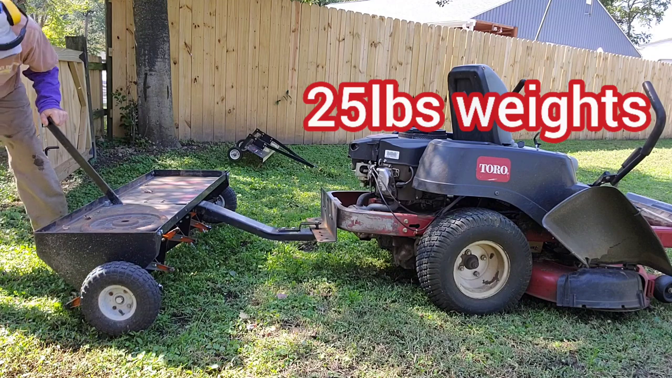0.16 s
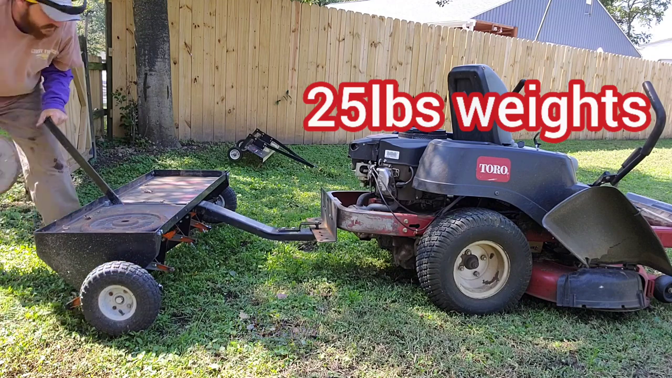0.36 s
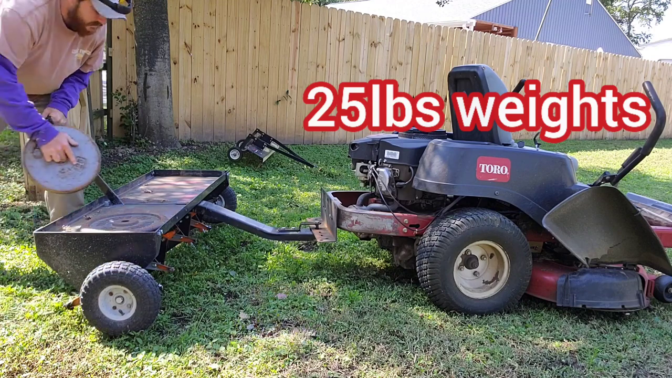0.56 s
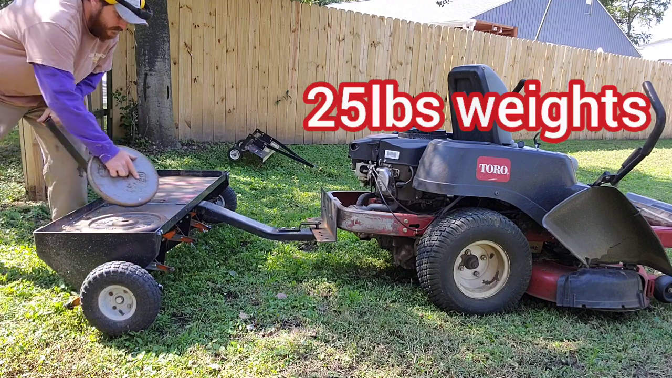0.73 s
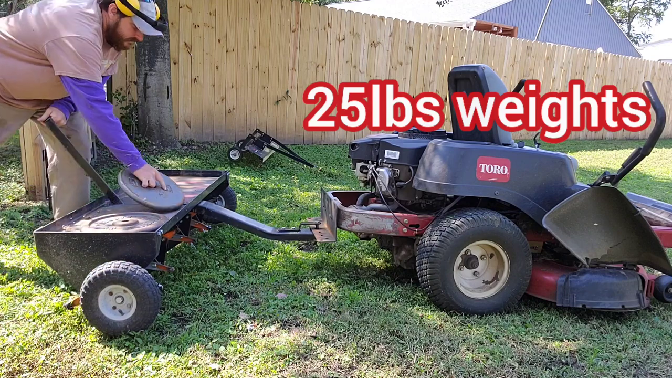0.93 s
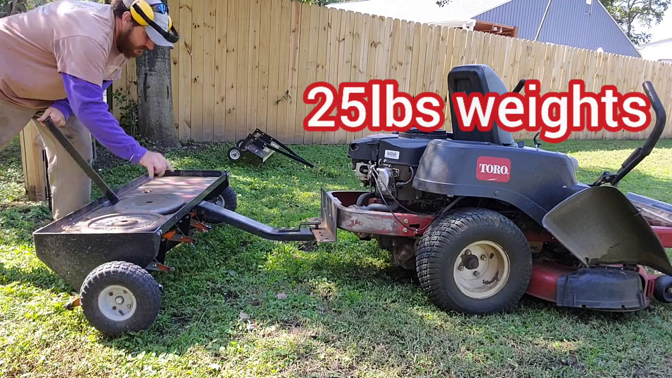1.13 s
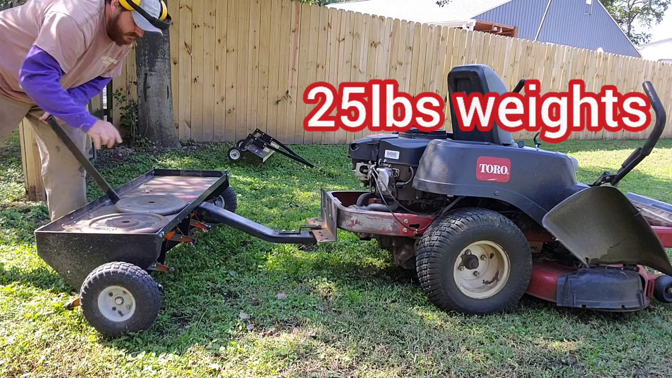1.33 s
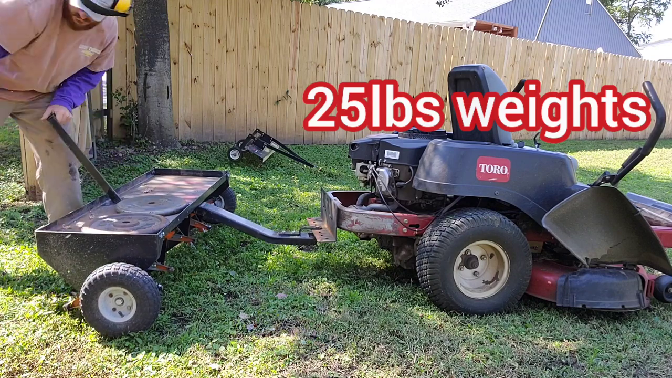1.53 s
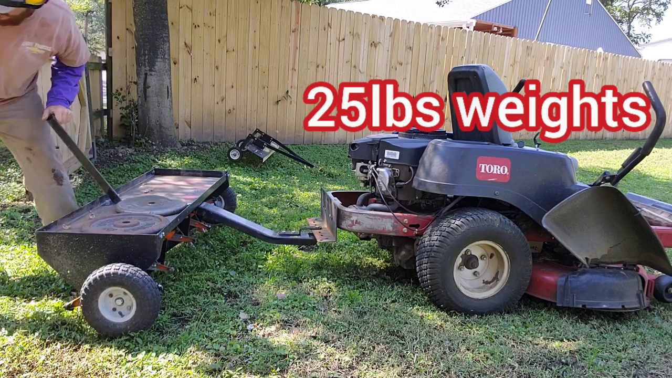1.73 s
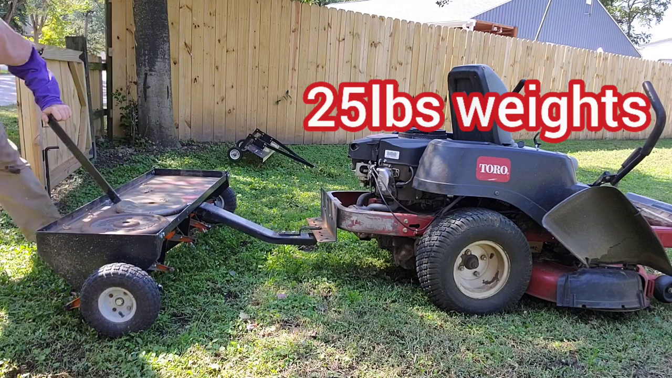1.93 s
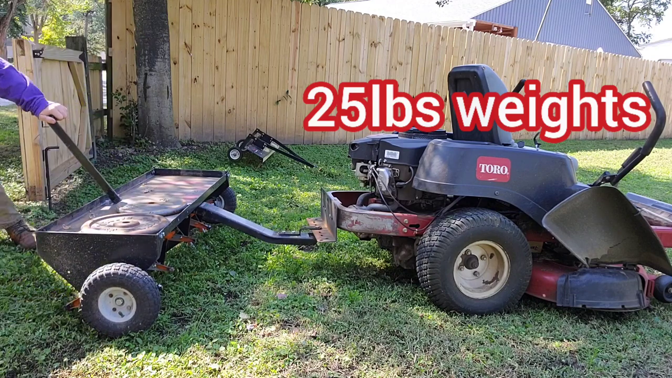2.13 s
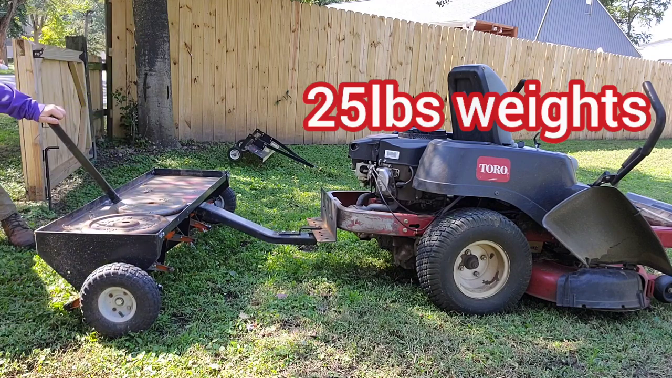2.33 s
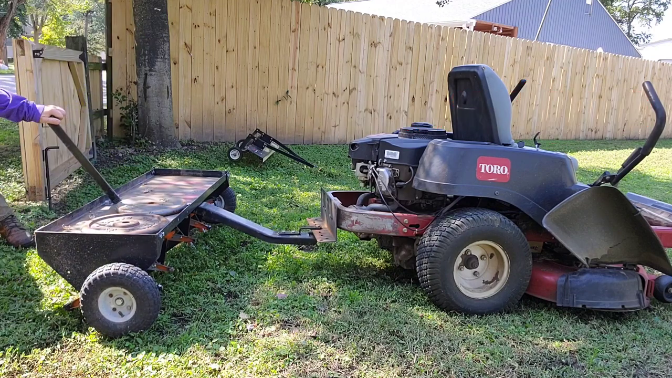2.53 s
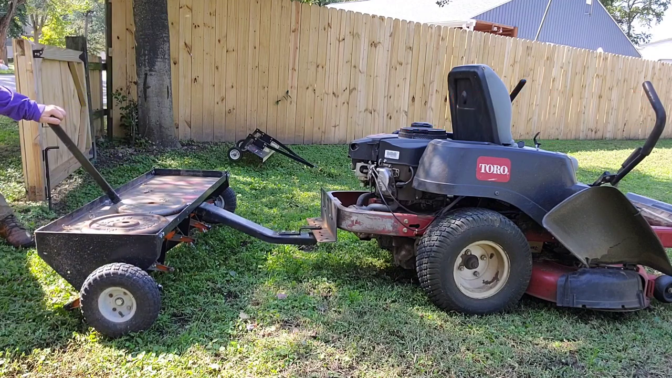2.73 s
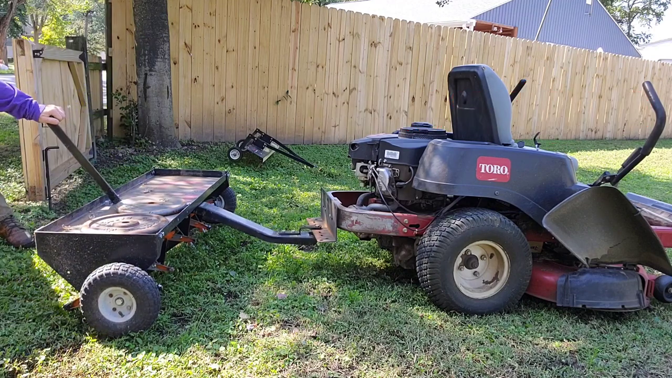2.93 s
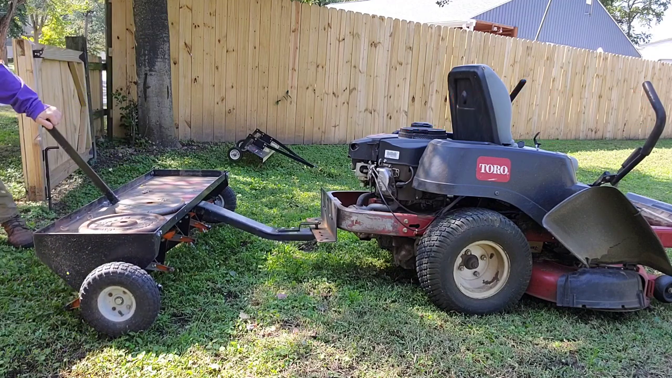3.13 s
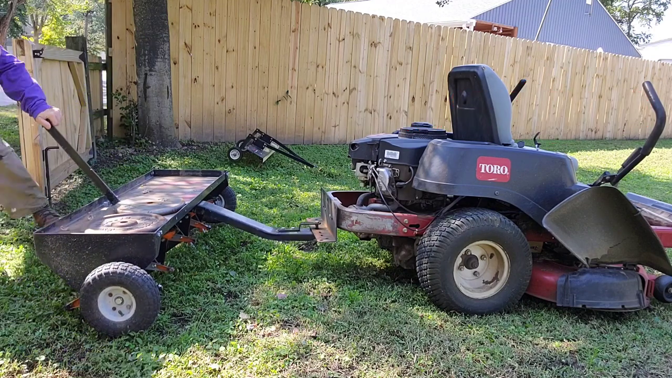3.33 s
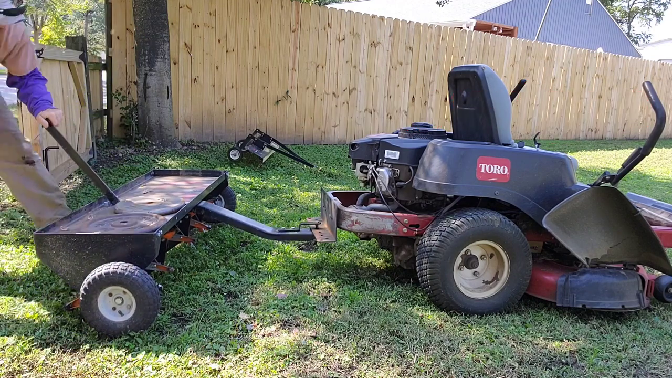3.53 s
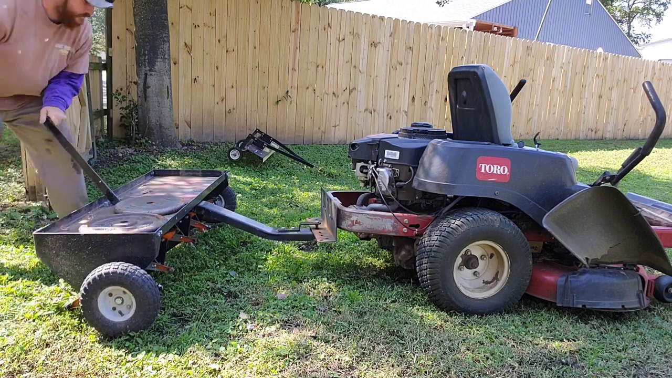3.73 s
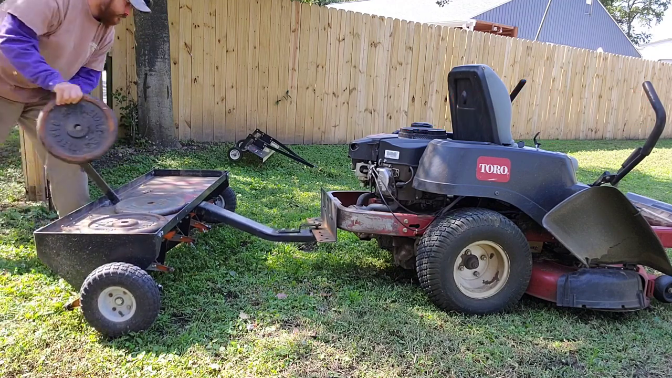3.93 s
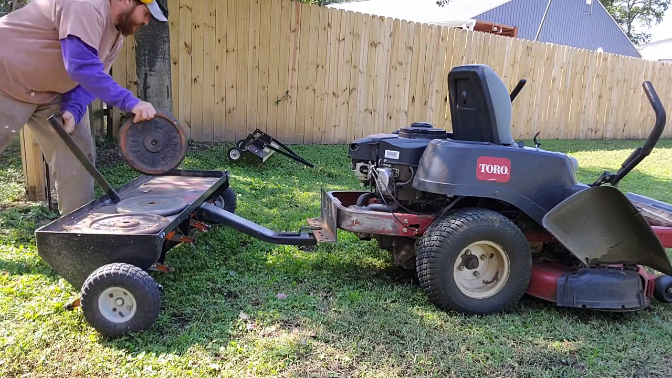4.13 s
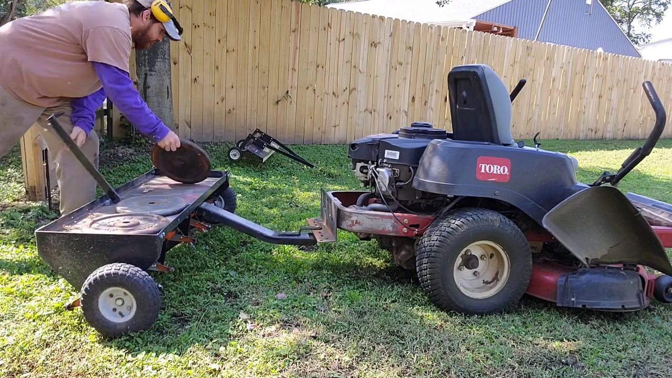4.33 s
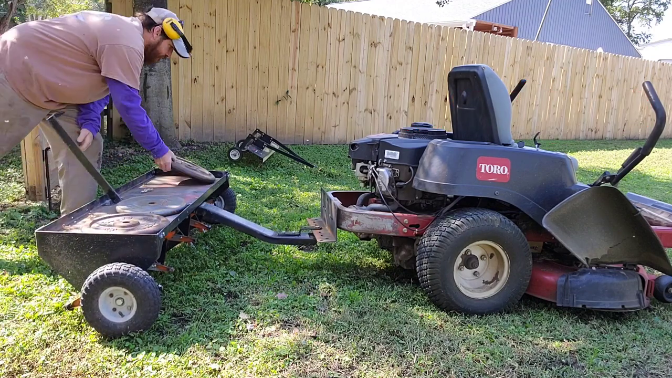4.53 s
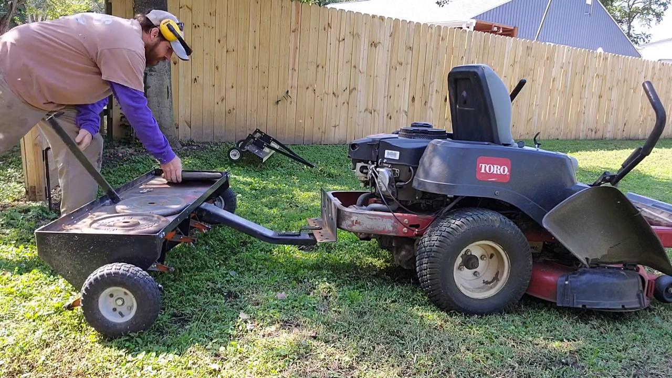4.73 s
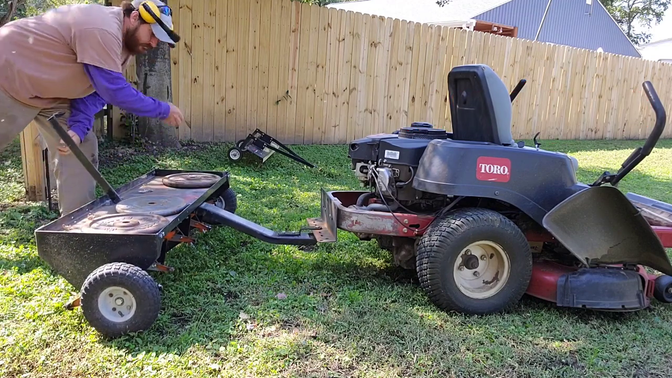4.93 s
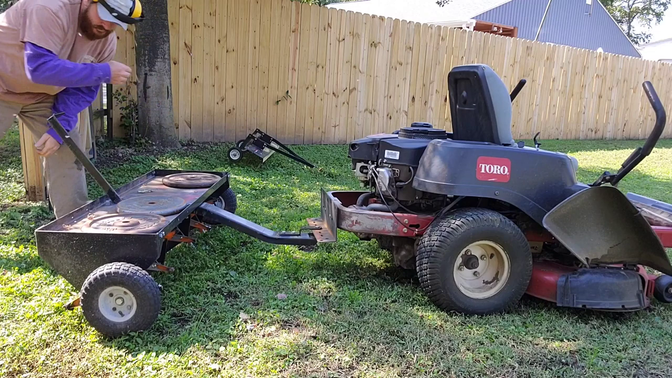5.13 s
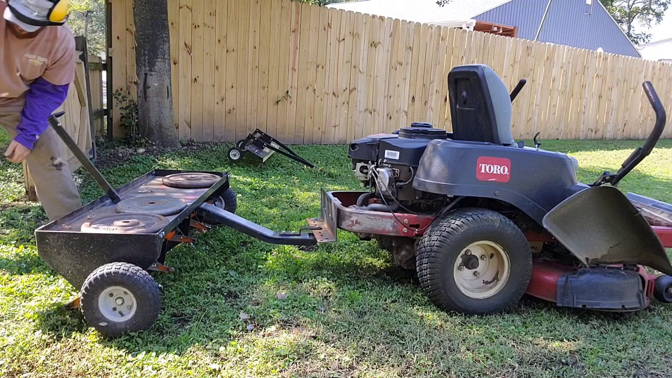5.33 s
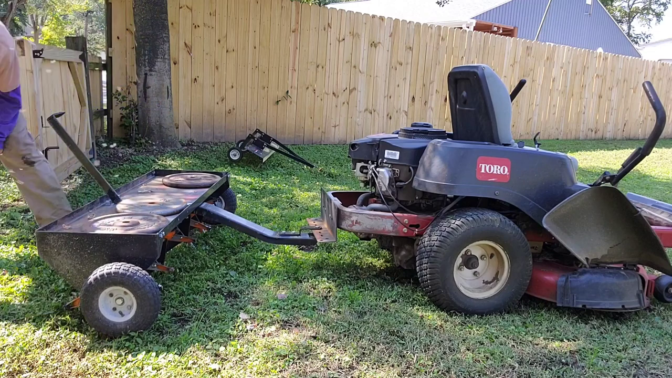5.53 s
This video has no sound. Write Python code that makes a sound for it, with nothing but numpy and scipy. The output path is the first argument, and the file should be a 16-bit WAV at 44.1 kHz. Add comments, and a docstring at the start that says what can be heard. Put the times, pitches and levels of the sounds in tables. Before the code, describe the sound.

An iron weight plate clinks off a stack, then lands on a steel trailer tray with a booming clang, chatters flat and scrapes. After a quiet pause, a second plate knocks against the stack and is set down with several loud clanks. The nearby impacts echo briefly around a yard, over a faint engine drone, soft steps in grass and two tiny bird chirps.

```python
"""In a fenced yard, two cast-iron weight plates are lifted off a stack and set on a garden trailer.
Each plate lands, chatters and rocks flat on the steel tray: the sheet steel booms and clangs,
the iron clinks and scrapes, and the fence and houses echo. Underneath, a distant engine drones,
soft steps crackle in the grass and a small bird calls twice."""
import sys
import numpy as np
from scipy import signal
from scipy.fft import rfft, irfft, next_fast_len
from scipy.io import wavfile
from scipy.ndimage import uniform_filter1d

SR = 44100
rng = np.random.default_rng(int(sys.argv[2]) if len(sys.argv) > 2 else 0)


def unload_audio(sound):
    """Save the sound as a 16-bit wav file, at the path given as the first command line argument."""
    columns = np.transpose(np.atleast_2d(sound))
    # keep every value between -1 and 1, then stretch to whole-number steps
    steps = np.round(np.clip(columns, -1, 1) * 32767)
    wavfile.write(sys.argv[1], SR, steps.astype(np.int16))


N = 245637


def undb(db):
    """Turn decibels into a number to multiply by."""
    return 10 ** (np.asarray(db) / 20)


def lookup(hz, points):
    """Read between (frequency, value) points, with all octaves equally wide."""
    f, value = np.transpose(points)
    return np.interp(np.log(hz + 1e-9), np.log(f), value)


def unit(x):
    """Scale a sound so that its channels have an average energy of 1."""
    return x / np.sqrt(np.mean(np.sum(x ** 2, axis=-1)))


def add(out, s, x):
    """Mix x into out, starting at s seconds."""
    i = max(int(s * SR), 0)
    out[..., i:i + x.shape[-1]] += x[..., :N - i]


def wander(rate):
    """A smooth random wobble, about 1 in size, that picks a new course `rate` times a second."""
    hold = int(SR / rate)
    steps = np.repeat(rng.standard_normal(N // hold + 1), hold)
    return 1.3 * uniform_filter1d(uniform_filter1d(steps, hold), hold)[:N]


def noise(size, colour, wide_hz=900):
    """Noise of a given colour: alike in both ears in the bass, unrelated in the treble."""
    hz = np.arange(size // 2 + 1) * SR / size
    mid, side = rfft(rng.standard_normal((2, size)))
    alike = 1 / (1 + (hz / wide_hz) ** 2)
    pair = mid * np.sqrt(1 + alike) + side * np.sqrt(1 - alike) * np.array([[1], [-1]])
    return unit(irfft(pair * undb(lookup(hz, colour)), size)) * np.sqrt(size)


def ring(colour, fades, size, octaves=9, lowest_hz=62.5):
    """Countless tones struck at once; each octave has its own t60, the time it takes to fade by 60 dB."""
    t = np.arange(size) / SR
    hz = np.arange(size // 2 + 1) * SR / size
    spectrum = rfft(noise(size, colour))
    octave = np.clip(np.log2(hz / lowest_hz + 1e-9), 0, octaves - 1)
    out = 0
    for k in range(octaves):
        band = irfft(spectrum * np.maximum(1 - abs(octave - k), 0), size)
        t60 = lookup(lowest_hz * 2 ** k, fades)
        out = out + band * np.exp(-np.log(1000) * t / t60)
    return unit(out)


# colour of the outdoor background: f/Hz, relative level/dB
AIR_COLOUR = [(20, -17), (40, -9.5), (57, -5), (95, -3.5), (125, -16.5), (170, -13), (240, -28), (480, -32),
              (780, -29), (1150, -36.5), (2200, -33.5), (4000, -41), (7500, -48.5), (16000, -59.5)]


def air(level_db=-54.5, waver_db=1.3):
    """A quiet outdoor rumble that slowly swells and sinks."""
    return noise(N, AIR_COLOUR) * undb(level_db + waver_db * wander(1.0))


# how loud the engine is over time: t/s, relative level/dB
ENGINE_LEVELS = [(0.0, -59), (0.37, -72), (0.98, -49), (2.57, -51.5), (4.16, -48.5), (5.57, -53.5)]


def engine(firing_hz=77.4, gain_db=-1.0, octave_db=-15, waver_db=2.54, drift=.015):
    """Only the engine's firing tone and its octave carry this far, wavering on the way."""
    s, db = np.transpose(ENGINE_LEVELS)
    level_db = np.interp(np.arange(N) / SR, s, db) + gain_db
    phase = 2 * np.pi * np.cumsum(firing_hz * (1 + drift * wander(1.7))) / SR
    hum = np.sin(phase) * undb(waver_db * wander(12))
    octave = np.sin(2 * phase) * undb(octave_db + waver_db * wander(12))
    return np.sqrt(2) * (hum + octave) * undb(level_db)


# the crowd of weak tones in struck metal: f/Hz, relative level/dB
CROWD_COLOUR = [(60, -44), (110, -21), (160, -18.5), (220, -7), (350, -3), (520, -7.5), (740, -11.5),
                (1000, -7.5), (1700, -7), (3100, -9), (3900, -13), (5700, -7.5), (7900, -16.5),
                (9200, -32.5), (12500, -27), (15800, -38.5)]
# how long they ring: f/Hz, t60/s
CROWD_FADES = [(100, 0.12), (350, 0.28), (1200, 0.21), (3000, 0.21), (6000, 0.075), (14000, 0.07)]


def metal(body, tones_db=-4.5, scatter_db=-0.5, patchy_db=3.5, crack_db=-7, crack_t60=0.1, size=24576):
    """Struck metal rings with its own tones; each spot that is hit mixes them differently."""
    t = np.arange(size) / SR
    hz, db, t60 = np.transpose(body)
    gain, left, right = rng.standard_normal((3, len(hz)))
    fading_waves = np.exp(np.outer(2j * np.pi * hz - np.log(1000) / t60, t))
    # high tones reach the two ears out of step
    phase = rng.uniform(0, 2 * np.pi, len(hz)) + np.minimum(hz / 1000, 2) * np.array([left, right])
    weights = undb(db + scatter_db * gain) / np.sqrt(t60) * np.exp(1j * phase)
    tones = unit((weights @ fading_waves).imag)
    # the weaker tones bunch together
    grid_hz = np.geomspace(60, 16000, 150)
    bunch_db = lookup(grid_hz, CROWD_COLOUR) + patchy_db * rng.standard_normal(len(grid_hz))
    bunches = np.column_stack([grid_hz, bunch_db])
    # tones choked by the contact die at once, as a crack
    crack = unit(noise(size, bunches) * np.exp(-np.log(1000) * t / crack_t60))
    return unit(ring(bunches, CROWD_FADES, size) + undb(tones_db) * tones + undb(crack_db) * crack)


def chatter(fade_s, bounces_per_s=1700, first_hit=.55, swell_s=0.006, size=6144):
    """One hard touch, then a shower of tiny bounces that builds and fades."""
    t = np.arange(size) / SR
    chance, strength = rng.random(size), rng.standard_normal(size)
    force = (chance < bounces_per_s / SR) * np.sign(strength) * np.sqrt(abs(strength))
    force *= (1 - np.exp(-t / swell_s)) * np.exp(-t / fade_s)
    force[0] = first_hit
    return unit(force)


def shade(x, boom_db, bright_db, edge_db=0, boom_hz=330, bright_hz=3000, edge_hz=8500):
    """A flat landing brings out the low boom, a rim the bright tones, a sharp edge the very top."""
    size = next_fast_len(x.shape[-1])
    hz = np.arange(1, size // 2 + 2) * SR / size
    low = 1 / (1 + np.log2(hz / boom_hz) ** 4)
    high = 1 / (1 + (bright_hz / hz) ** 3)
    top = 1 / (1 + (edge_hz / hz) ** 8)
    log_gain = np.log(undb(boom_db * low + bright_db * high + edge_db * top))
    # build the filter so that nothing sounds before the touch (minimum phase)
    cepstrum = irfft(log_gain, size)[:size // 2]
    response = np.exp(2 * rfft(cepstrum, size) - cepstrum[0])
    return irfft(rfft(x, size) * response, size)[:, :x.shape[-1]]


def knocks(blows, body, edge_db, gain_db=31):
    """Blows set metal ringing. Each is: t/s, relative level/dB, boom/dB, brightness/dB, chatter/s."""
    out = np.zeros((2, N))
    for s, db, boom_db, bright_db, chatter_s in blows:
        clank = signal.fftconvolve(metal(body), chatter(chatter_s)[None], axes=1)
        add(out, s, undb(db + gain_db) * shade(clank, boom_db, bright_db, edge_db))
    return out


# strongest tones of the stack: f/Hz, relative level/dB, t60/s
STACK_TONES = [(225, 3, 0.28), (450.5, 0.5, 0.4), (582, 0.5, .18), (706.3, -14, 0.37), (856, -5.5, 0.493),
               (1088, 5, 0.11), (1484, -7, 0.38), (1836, -3.5, 0.36), (2320, 2, .16), (2929, -5, .2),
               (4340, -11.5, .16), (4533, -10.5, 0.16), (4953, -24.5, 0.2), (5760, -4.5, 0.055),
               (5660, -15.5, 0.12)]
# knocks on the stack: t/s, relative level/dB, boom/dB, chatter/s,
# then its settling: delay/s, level change/dB, boom/dB, brightness/dB
STACK_KNOCKS = [(0.0444, -38, -0.5, .005, .028, -18, 17, -10.5),
                (3.072, -25.5, 2.5, 0.0062, 0.067, -5, -5, -3),
                (4.0761, -22.5, -5.5, 0.0022, .098, -11.5, -2, -8)]


def lifting(bright_db=4, settle_chatter_s=0.014):
    """A lifted plate knocks sharply on the stack; those left behind settle with a duller rattle."""
    blows = []
    for s, db, boom_db, chatter_s, after_s, settle_db, settle_boom_db, settle_bright_db in STACK_KNOCKS:
        blows.append((s, db, boom_db, bright_db, chatter_s))
        blows.append((s + after_s, db + settle_db, settle_boom_db, settle_bright_db, settle_chatter_s))
    return knocks(blows, STACK_TONES, edge_db=3.5)


# colour of the echo from fence, houses and trees: f/Hz, relative level/dB
ECHO_COLOUR = [(100, -0.5), (400, -2), (1200, 2.5), (2200, -4), (3500, -3.5), (5500, -10), (9000, -7.5),
               (16000, -10)]
# how long the far echo lasts: f/Hz, t60/s
ECHO_FADES = [(100, 2.1), (1200, 0.74), (5000, .95), (14000, 0.67)]


def yard(x, fence_s=.05, fence_db=-15, fence_t60=0.077, spread_s=0.012, far_s=0.047, far_db=-26):
    """The slatted fence scatters a near echo; houses and trees leave a faint long tail."""
    echo = np.zeros((2, N))
    slats = ring(ECHO_COLOUR, [(100, fence_t60), (16000, fence_t60 / 2)], size=16384)
    # the nearest slats answer first, then more and more join in
    build = 1 - np.exp(-np.arange(slats.shape[-1]) / SR / spread_s)
    add(echo, fence_s, undb(fence_db) * unit(slats * build))
    add(echo, far_s, undb(far_db) * ring(ECHO_COLOUR, ECHO_FADES, size=65536))
    return x + signal.fftconvolve(x, echo, axes=1)[:, :N]


# steps in the grass: t/s, length/s, level/dB
GRASS_STEPS = [(0.264, 0.1, -62.5), (2.056, .11, -61.5), (2.199, 0.15, -74.5), (3.772, 0.2, -61.5),
               (5.166, 0.18, -54)]


def footsteps():
    """Blades of grass crackle softly under each step."""
    press = np.zeros(N)
    for s, length, db in GRASS_STEPS:
        add(press, s, undb(db) * np.hanning(int(length * SR)))
    crackle = undb(3 * wander(700))
    return press * crackle * noise(N, [(200, 11.5), (2500, 6), (7000, 1.5), (9500, -5), (15000, -5)])


# a hand lowers a plate onto the tray: t/s, relative level/dB, boom/dB, chatter/s,
# then its second rim: delay/s, level change/dB
RIM_TOUCHES = [(0.891, -28, 10, 0.015, 0.026, -3), (0.974, -28, 2, 0.0051, 0.02, 8.5),
               (4.37, -14.5, 3.5, 0.0053, 0.022, -1.5), (4.5893, -14.5, -0.5, 0.013, .0437, -2),
               (4.7942, -24.5, -4.5, 0.009, .04, -9)]


def lowering(thud_bright_db=-8.5, clink_bright_db=0.5, clink_chatter_s=0.012):
    """List the blows of a lowered plate: one rim thuds down, it rocks over and the other rim clinks."""
    blows = []
    for s, db, boom_db, chatter_s, after_s, change_db in RIM_TOUCHES:
        blows.append((s, db, boom_db, thud_bright_db, chatter_s))
        blows.append((s + after_s, db + change_db, boom_db, clink_bright_db, clink_chatter_s))
    return blows


# strongest tones of the tray and of each plate lying on it: f/Hz, relative level/dB, t60/s
TRAY_TONES = [(206, -6, 0.34), (294, -2, 0.12), (362.2, 1.5, 0.12), (666, -14, 0.09), (871, -4, 0.26),
              (966.7, -3, 0.16), (1486, -5, 0.45), (1650, -7.5, 0.14), (1732, -8, 0.37), (1830, -0.5, 0.18),
              (2310, -8, .26), (2320, -13, 0.077)]
FIRST_PLATE_TONES = [(322.5, 8, 0.33), (1129, -5, 0.3), (1212, -3, 0.2), (1357, -9, 0.29), (1836, -7, 0.53),
                     (4570, -15, .2), (5090, 2.5, 0.048), (5130, -5, 0.082), (5600, -6.5, 0.11),
                     (5830, -9, 0.077)]
SECOND_PLATE_TONES = [(287, -3, 0.23), (419.8, 1, .22), (486, -14.5, 0.36), (1186, -7.5, 0.2),
                      (1220, -1, 0.21), (1420, 1.5, 0.083), (1837, 5.5, 0.099), (2680, -19, 0.067),
                      (3064, -1.5, .16), (3100, -13, 0.18), (5470, -23, 0.35), (6000, -6, 0.092)]


def tray_clangs(blows, let_go_s=1.1, second_plate_s=2.5):
    """Tray and plate ring together, but while the hand grips the first plate only the tray rings."""
    held = [blow for blow in blows if blow[0] < let_go_s]
    first = [blow for blow in blows if let_go_s < blow[0] < second_plate_s]
    second = [blow for blow in blows if blow[0] > second_plate_s]
    return (knocks(held, TRAY_TONES, edge_db=0.5)
            + knocks(first, TRAY_TONES + FIRST_PLATE_TONES, edge_db=0)
            + knocks(second, TRAY_TONES + SECOND_PLATE_TONES, edge_db=1.0))


# iron sliding on the tray and on the stack: t/s, length/s, relative level/dB, boom/dB, brightness/dB
TRAY_SCRAPES = [(1.03, 0.22, -22, -1, -3.5), (1.38, 0.074, -25.5, -6.5, -7.5), (4.46, 0.15, -35.5, 0, -3),
                (5.1, 0.47, -62, -13, 8.5)]
STACK_SCRAPES = [(2.97, 0.17, -46, 5, -13), (3.75, 0.53, -56.5, -1.5, -8), (4.02, 0.099, -42, -2.5, -6)]


def scrapes(slides, body, catches_per_s=2500):
    """The rough iron catches and lets go at random as it slides, making the metal below it ring."""
    out = np.zeros((2, N))
    caught = rng.random(N) < catches_per_s / SR
    catches = unit(caught * rng.standard_normal(N)) * np.sqrt(N)
    for s, length, db, boom_db, bright_db in slides:
        press = np.hanning(int(length * SR))
        force = press * catches[int(s * SR):][:len(press)]
        scrape = signal.fftconvolve(metal(body), force[None], axes=1)
        add(out, s, undb(db) * shade(scrape, boom_db, bright_db))
    return out


# a plate slaps down flat: t/s, relative level/dB, boom/dB, brightness/dB, chatter/s,
# edge grazes earlier by/s, graze compared with slap/dB, change per bounce/dB
FLAT_FALLS = [(1.1324, -11.5, -3.5, 6, 0.027, .0274, -9, -3),
              (1.3003, -11.5, -6, 2, 0.0098, 0.021, -11.5, -7),
              (4.878, -9, -2, 2.5, 0.011, .014, -13.5, -9.5)]
# a last tick as each plate comes to rest: t/s, relative level/dB
LAST_TICKS = [(1.5015, -33), (5.065, -44)]


def falling(hits=3, gap_s=.035, shrink=.85, duller_db=3, graze_bright_db=4.5, graze_chatter_s=.008,
            tick_boom_db=-19, tick_bright_db=-4, tick_chatter_s=0.0043):
    """List the blows of a falling plate: the edge grazes, the face slaps, bounces and ticks to rest."""
    blows = []
    for s, db, boom_db, bright_db, chatter_s, lead_s, graze_db, bounce_db in FLAT_FALLS:
        blows.append((s - lead_s, db + graze_db, boom_db, bright_db + graze_bright_db, graze_chatter_s))
        for k in range(hits):  # each bounce comes sooner, softer and duller
            blows.append((s, db + k * bounce_db, boom_db, bright_db - k * duller_db,
                          chatter_s * shrink ** k))
            s += gap_s * shrink ** k
    return blows + [(s, db, tick_boom_db, tick_bright_db, tick_chatter_s) for s, db in LAST_TICKS]


# the bird's two calls: t/s, length/s, start f/Hz, end f/Hz, level/dB
BIRD_CALLS = [(2.462, 0.064, 6370, 7320, -60.5), (3.354, 0.054, 6150, 7500, -56.5)]


def bird(trees_db=-7, trees_t60=0.58):
    """Thin rising whistles that linger among the trees."""
    calls = np.zeros((2, N))
    for s, length, start_hz, end_hz, db in BIRD_CALLS:
        hz = np.linspace(start_hz, end_hz, int(length * SR))
        whistle = np.sin(2 * np.pi * np.cumsum(hz) / SR)
        add(calls, s, undb(db) * np.hanning(len(hz)) * whistle)
    trees = ring(ECHO_COLOUR, [(100, trees_t60), (16000, trees_t60)], size=32768)
    return calls + undb(trees_db) * signal.fftconvolve(calls, trees, axes=1)[:, :N]


def scene(right_db=1.42, left_lag_samples=5):
    """The plates clank a little to the right, over the quiet sounds of the yard."""
    plates = lifting() + tray_clangs(lowering() + falling())
    plates += scrapes(STACK_SCRAPES, STACK_TONES) + scrapes(TRAY_SCRAPES, TRAY_TONES)
    balance = undb(np.array([[-right_db], [right_db]]) / 2)
    left, right = yard(plates) * balance + air() + engine() + bird() + footsteps()
    late_left = np.pad(left, (left_lag_samples, 0))[:N]
    return np.array([late_left, right])


def record(dry, ceiling=3.2, top_hz=16000):
    """The microphone rounds off the loudest peaks, and the highest treble is cut."""
    rounded = ceiling * np.tanh(dry / ceiling)
    return signal.sosfilt(signal.ellip(10, .2, 70, top_hz, fs=SR, output="sos"), rounded)


dry = scene()
out = record(dry)
unload_audio(out)
```